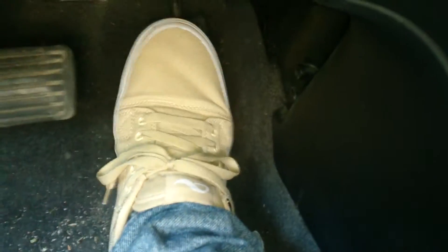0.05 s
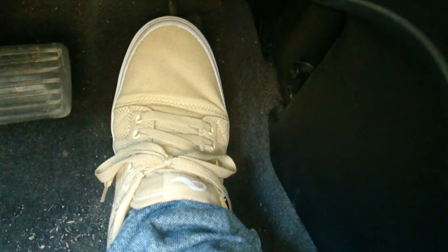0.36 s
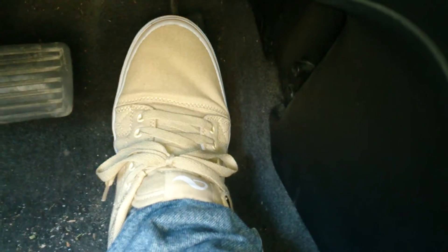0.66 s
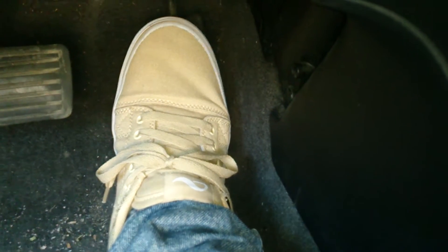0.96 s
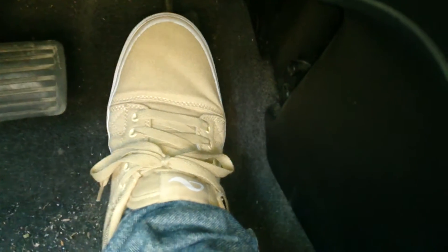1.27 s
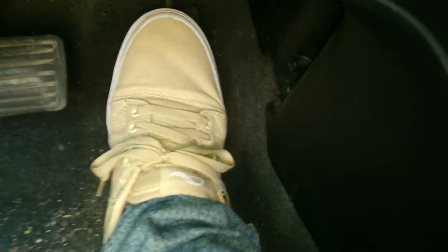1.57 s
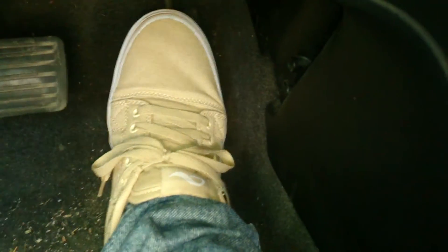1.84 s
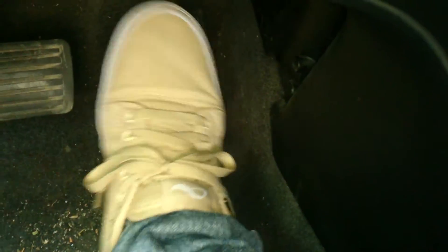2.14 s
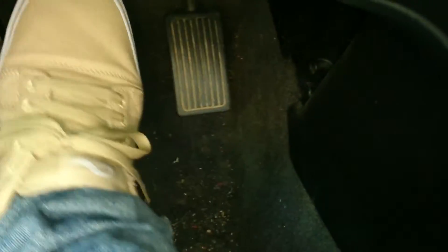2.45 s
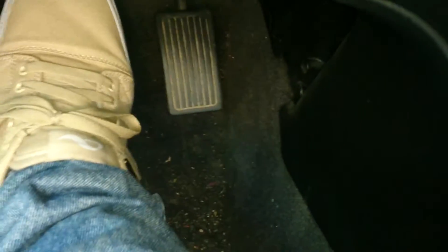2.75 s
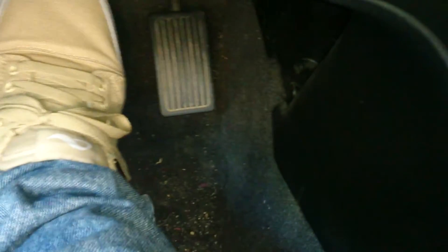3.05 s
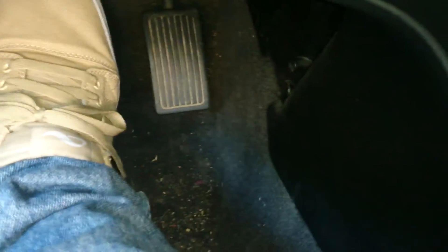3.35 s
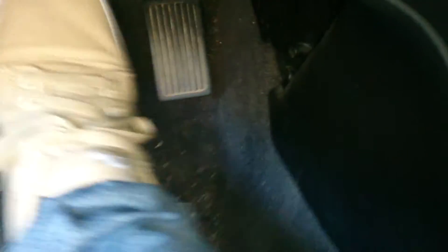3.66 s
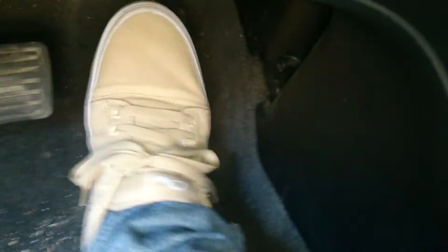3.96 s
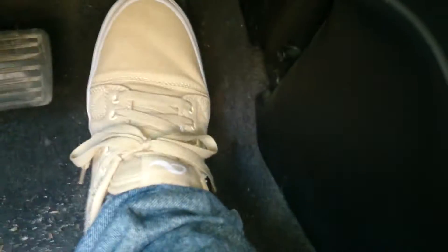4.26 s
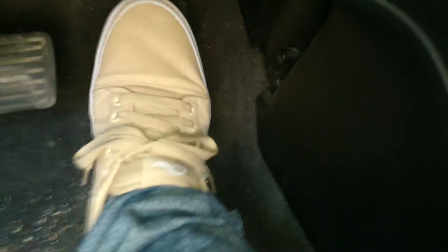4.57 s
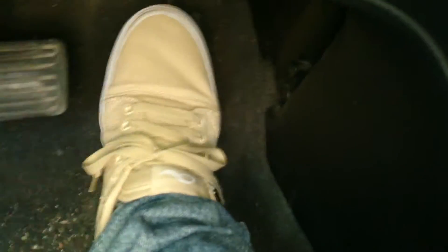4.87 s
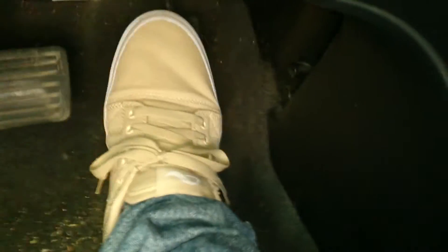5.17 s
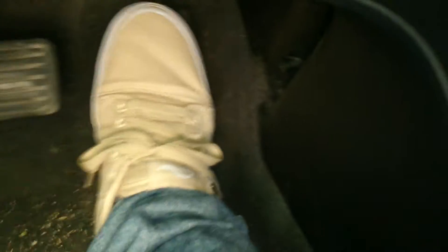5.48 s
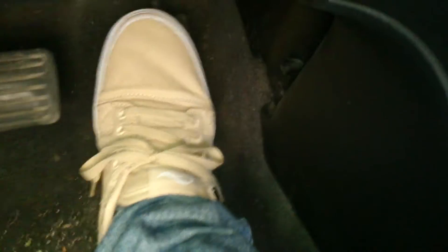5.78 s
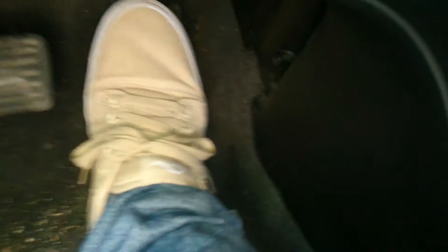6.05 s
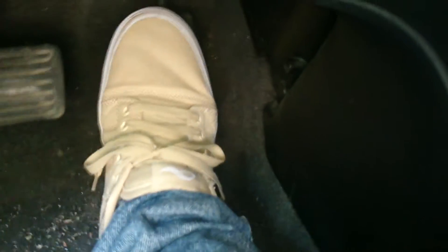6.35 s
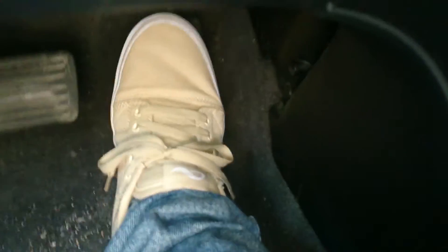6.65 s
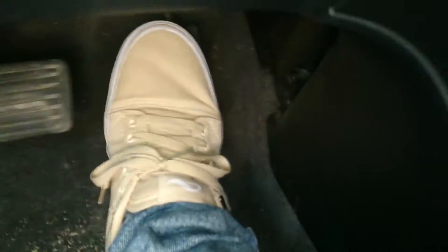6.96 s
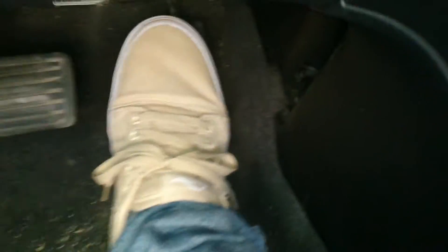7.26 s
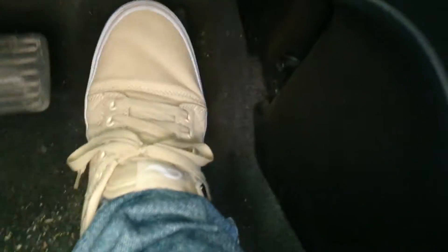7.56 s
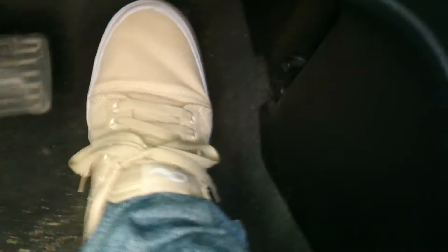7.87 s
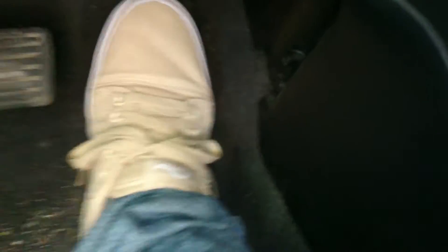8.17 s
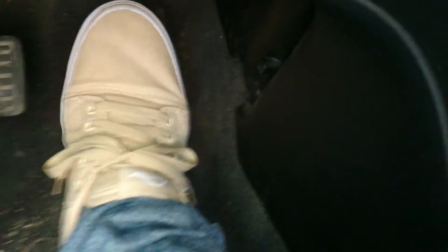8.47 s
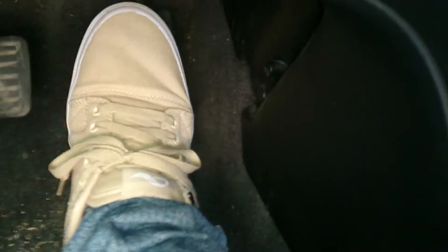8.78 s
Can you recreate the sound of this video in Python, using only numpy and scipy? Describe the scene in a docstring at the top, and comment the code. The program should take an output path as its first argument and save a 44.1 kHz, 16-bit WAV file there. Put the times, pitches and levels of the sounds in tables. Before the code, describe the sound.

Deep road rumble and a low engine hum fill a car cabin, with the microphone down by the pedals. A brief pedal creak comes first, then soft bumps and scuffs of a shoe. The engine picks up a little and the gravel road gets rougher, with dull jolts, clacking trim and sharp pebble strikes underneath. Through the second half, a bunch of keys clinks brightly nearby on the right.

```python
"""Driver's footwell of a car rolling slowly along a gravel road; stereo microphone low down, louder on the
right. From below, the body rumbles over bumps, tyres crunch and pebbles knock on the floor pan; loose trim
rattles. Beside the microphone the brake pedal sticks and slips in a creak, the shoe moves over to the
accelerator, and the engine picks up behind the bulkhead. Close by, small metal parts, likely the keys in
the ignition, strike each other and jingle."""
import sys
import numpy as np
from scipy import signal
from scipy.fft import rfft, irfft, next_fast_len
from scipy.io import wavfile
from scipy.ndimage import uniform_filter1d

SR = 44100
rng = np.random.default_rng(int(sys.argv[2]) if len(sys.argv) > 2 else 0)


def waveform_to_disk(signal):
    """Save audio, clipped to [-1, 1], as 16-bit WAV at the path in sys.argv[1]."""
    frames = np.transpose(np.atleast_2d(signal))
    scaled = np.clip(frames, -1, 1) * 32767
    samples = np.round(scaled).astype(np.int16)
    wavfile.write(sys.argv[1], SR, samples)


N = 397782
TIME = np.arange(N) / SR
AGE = TIME[:SR // 2]   # time since a blow


def from_db(db):
    return 10 ** (np.asarray(db) / 20)


def rms_one(x):
    return x / np.sqrt(np.mean(x ** 2) + 1e-20)


def blow_one(x):
    """Scales a blow to rms 1 over its first 20 ms."""
    return x / np.sqrt(np.mean(x[:SR // 50] ** 2) + 1e-20)


def in_time(rows):
    """Columns of a curve table at every sample."""
    s, *columns = np.transpose(rows)
    return [np.interp(TIME, s, c) for c in columns]


def on_bins(points, size):
    """Columns of a table over frequency at every FFT bin."""
    hz, *columns = np.transpose(points)
    bins = np.maximum(np.fft.rfftfreq(size, 1 / SR), 1)
    return [np.interp(np.log(bins), np.log(hz), c) for c in columns]


def coloured(x, spectrum):
    """Gives x a spectrum that falls away beyond its ends; rms 1."""
    closed = [(spectrum[0][0] / 2, -90), *spectrum, (spectrum[-1][0] * 2, -90)]
    size = next_fast_len(x.shape[-1])
    gain = from_db(on_bins(closed, size)[0])
    return rms_one(irfft(rfft(x, size) * gain, size)[..., :x.shape[-1]])


def drift(per_s):
    """A random wander between knots of rms 1."""
    knots = rms_one(rng.standard_normal(1000))
    return np.interp(TIME * per_s, np.arange(len(knots)), knots)


def rise(seconds):
    return 1 - np.exp(-AGE / seconds)


def fade(t60):
    return from_db(-60 * AGE / t60)


def span(start, length, edge_s):
    """Rises, holds and falls again."""
    return np.clip(np.minimum(TIME - start, start + length - TIME) / edge_s + .5, 0, 1)


def resonate(x, modes):
    """Parallel resonances of alternating sign."""
    out = 0
    for k, (hz, width, db) in enumerate(modes):
        r = np.exp(-np.pi * width / SR)
        ring = signal.lfilter([1, 0, -1], [1, -2 * r * np.cos(2 * np.pi * hz / SR), r * r], x + 1e-18)
        out = out + (-1) ** k * from_db(db) * (1 - r * r) / 2 * ring
    return out


def butter(x, hz, kind):
    return signal.sosfilt(signal.butter(2, hz, kind, fs=SR, output="sos"), x)


def add(track, s, sound):
    at = round(s * SR)
    track[at:at + len(sound)] += sound[:N - at]


def contact(t60, click):
    """A first click, then a quickly dying chatter."""
    force = rng.standard_normal(len(AGE)) * fade(t60)
    force[0] += click
    return force


def burst(colour, rise_s, t60):
    """A short blow of coloured noise."""
    return blow_one(coloured(rng.standard_normal(len(AGE)), colour) * rise(rise_s) * fade(t60))


def random_hits(per_s, size_db):
    """Impulses of uneven size at random times."""
    return (rng.random(N) < per_s / SR) * from_db(size_db * np.clip(rng.standard_normal(N), -2, 2))


def placed(x, right_db):
    """Leans a sound to the right, keeping the mean of both sides."""
    sides = from_db([[0], [right_db]])
    return x * sides / sides.mean()


def footwell(x, wet_db, t60, shaded_db):
    """Short reflections off trim and carpet; the direct sound reaches the shaded left late and weak."""
    echoes = rng.standard_normal((2, len(AGE))) * fade(t60) * rise(0.0027)
    echoes /= np.sqrt(np.sum(echoes ** 2, axis=1, keepdims=True))
    late = np.interp(TIME - .00025, TIME, x)
    direct = np.array([from_db(shaded_db) * late, 1.375 * x])
    return direct + from_db(wet_db) * signal.oaconvolve(x[None], echoes, axes=1)[:, :N]


# Road noise across the microphone: f/Hz, right over left/dB, likeness/0-1, lead of the left/rad
ROAD_FIELD = [(25, 14, 0.98, 0.97), (71, 5.5, 0.8, 0.18), (202, 3.5, 0.89, 0.078), (650, 5, 0.83, 0.091),
              (1330, 14.5, 0, 0.063), (2500, 9.5, 0, 0.51), (7000, 7.5, 0.08, 0.47), (15000, 0, 0.02, 0)]

def road_noise(pair, spectrum, steady_s):
    """Two noises become a field alike in the bass, diffuse in the treble, evened to 1 over steady_s."""
    size = next_fast_len(N)
    right_db, alike, lead = on_bins(ROAD_FIELD, size)
    mid, side = rfft(pair, size) * np.sqrt([1 + alike, 1 - alike])
    left = (mid + side) * from_db(-right_db / 2) * np.exp(1j * lead)
    right = (mid - side) * from_db(right_db / 2)
    field = coloured(irfft([left, right], size)[:, :N], spectrum)
    return field / np.sqrt(uniform_filter1d(field.mean(0) ** 2, int(steady_s * SR)) + 1e-9)


def gravel(per_s, size_db):
    """Stones grind under the tyres: random clicks of very uneven size."""
    born = rng.random(N) < per_s * from_db(4 * drift(14)) / SR
    sizes = from_db(size_db * np.minimum(rng.exponential(1, N), 2))
    return rms_one(born * sizes * rng.standard_normal((2, N)))


# How hard the car rolls: t/s, level re full pace/dB
PACE = [(0, -4), (0.7, -12.5), (1.7, -11.5), (3.5, -13.5), (3.85, -3.5), (4.7, -4.5), (5.1, 0), (5.9, -0.5),
        (7.3, 2), (9.02, -0.5)]
# Bumps passing underneath: crest t/s, lift of the rumble/dB, length/s (the swell spans 1.4 lengths)
BUMPS = [(0.182, 11.5, 0.18), (1.086, 10.5, 0.081), (1.387, 14.5, 0.15), (3.63, 8, 0.16),
         (4.186, 9.5, 0.11), (4.452, 8, 0.078), (4.993, 4.5, 0.89), (5.822, 3, 0.062), (7.15, 2.5, 0.36),
         (8.159, 7.5, 0.2)]
# Spectra of body, cabin, tyres and gravel, from inside the car: f/Hz, density/dB
BODY_RUMBLE = [(7.1, -33), (12, 5), (29, -2.5), (72, -12), (94, -28.5), (160, -120)]
CABIN_BOOM = [(45, -33), (66, -0.5), (85, 5.5), (105, -2), (135, -7.5), (165, -28)]
TYRE_ROAR = [(100, -32), (170, 0), (232, 3), (305, -3), (444, -6.5), (520, -2), (622, -9), (716, -6.5),
             (811, -20.5), (941, -18), (1030, -37), (1100, -26), (1430, -41), (2420, -120)]
GRAVEL_CRUNCH = [(590, -15), (1000, 3.5), (1610, -3), (2370, -5), (2930, -10.5), (5660, -18), (7260, -13.5),
                 (8140, -20.5), (9860, -23.5), (10700, -26), (15000, -39.5)]
# Cabin resonances around the microphone: f/Hz, width/Hz, level/dB
CABIN_MODES = [(517.2, 9.1, 2.5), (260, 6, -17.5), (930, 25, -13.5)]

def road():
    """The body heaves on its springs, the cabin booms, tyres roar; more pace makes the crunch grittier."""
    pace_db, = in_time(PACE)
    lift_db = sum(db * np.cos(np.pi * np.clip((TIME - s) / length / 1.4, -.5, .5)) ** 2
                  for s, db, length in BUMPS)
    white = rng.standard_normal((4, 2, N))
    rumble = road_noise(white[0], BODY_RUMBLE, steady_s=0.1133)
    boom = road_noise(white[1], CABIN_BOOM, steady_s=0.17)
    tread = white[2] * from_db(1.8 * drift(25) + 1.2 * drift(9.1))
    roar = road_noise(tread + 0.5 * resonate(tread, CABIN_MODES), TYRE_ROAR, steady_s=0.38)
    stones = white[3] + from_db(0.68 * pace_db + 4.5) * gravel(per_s=1100, size_db=2.5)
    crunch = road_noise(stones, GRAVEL_CRUNCH, steady_s=0.47)
    # each part: its level at full pace, plus its share of the pace and of the bumps
    return (from_db(-17 + pace_db + lift_db) * rumble
            + from_db(-29.5 + 0.96 * pace_db + 0.42 * lift_db) * boom
            + from_db(-44 + 0.5 * pace_db + 0.061 * lift_db) * roar
            + from_db(-58 + 0.68 * pace_db) * crunch)


# Engine, behind the bulkhead: t/s, firing f/Hz, first order level/dB, second order level/dB
ENGINE_RUN = [(0.0, 40.38, -27.5, -45), (0.7, 38.79, -32.5, -55), (2.0, 37.66, -29.5, -49.5),
              (3.3, 37.77, -35, -44.5), (4.6, 39.32, -26.5, -31.5), (5.73, 41.69, -19.5, -32.5),
              (6.4, 39.96, -40, -32), (8.29, 42.68, -29.5, -26.5), (9.02, 41.3, -32.5, -26.5)]
# Its higher orders: multiple of the firing rate, level/dB
ENGINE_ORDERS = [(3.5, -51), (6, -59.5), (6.5, -64.5), (8, -62.5), (9, -64.5)]
# Its burr: f/Hz, density/dB
BURR_COLOUR = [(170, -16), (215, 2.5), (330, 5.5), (380, -11)]

def engine(burr_db=-55.5):
    """The firing orders hum and a burr pulses with each firing; under load the second order drones."""
    firing_hz, first_db, drone_db = in_time(ENGINE_RUN)
    phase = 2 * np.pi * np.cumsum(firing_hz * (1 + 0.00698 * drift(8))) / SR
    first = from_db(first_db + 1.5 * drift(5.9)) * np.sin(phase)
    drone = from_db(drone_db + 1.2 * drift(7.8)) * np.sin(2 * phase)
    higher = sum(from_db(db + 2.7 * drift(4.6)) * np.sin(order * phase) for order, db in ENGINE_ORDERS)
    burr = from_db(burr_db) * coloured(rng.standard_normal(N) * (1 + np.cos(phase)), BURR_COLOUR)
    return np.sqrt(2) * (first + drone + higher) + burr


# Faint whine from the engine bay, well right of the microphone: t/s, level/dB
WHINE_LEVEL = [(0, -69), (1.6, -68), (2.2, -66), (2.9, -63.5), (3.4, -74), (4.5, -68.5), (9, -63.5)]

def whine(hz=950, width_hz=55):
    """A narrow, unsteady tone, perhaps the fan."""
    line = [(hz, width_hz, 0)]
    tone = rms_one(resonate(resonate(rng.standard_normal(N), line), line))
    return from_db(in_time(WHINE_LEVEL)[0]) * tone


# Floor pan, just under the microphone: f/Hz, width/Hz, level/dB
PAN_MODES = [(550, 150, 18.5), (930, 1100, 12.5), (1260, 290, 9.5), (2010, 290, 16), (2370, 250, 11.5),
             (2740, 250, 11.5), (3430, 1300, 7.5)]

def grit(per_s=16, level_db=-63, t60=0.09):
    """Small stones thrown up at random tick on the floor pan, harder and more often with pace."""
    pace = from_db(in_time(PACE)[0])
    thrown = random_hits(per_s * pace, size_db=2.5) * pace
    force = signal.oaconvolve(thrown, fade(t60))[:N] * rng.standard_normal(N)
    return from_db(level_db) * rms_one(butter(resonate(force, PAN_MODES), 2700, "low"))


# Loose trim knocking in the cabin: t/s, level/dB, panel f/Hz
TRIM_KNOCKS = [(3.942, -54, 1015), (4.177, -52, 850), (4.305, -53, 787), (4.944, -44, 890),
               (5.421, -64, 720), (5.665, -37.5, 1000), (6.675, -47, 720), (7.297, -56, 800),
               (7.568, -40.5, 620), (7.798, -49, 690)]
# Panels that rattle at random: f/Hz
LOOSE_PANELS = [480, 620, 754, 1180]

def trim(t60=0.049, width_hz=450, per_s=4, rattle_db=-57):
    """Heavily damped panels give dull clacks at the bumps and rattle more as the car gathers pace."""
    knocks, loose = np.zeros((2, N))
    pace = from_db(in_time(PACE)[0])
    for s, db, hz in TRIM_KNOCKS:
        add(knocks, s, from_db(db) * blow_one(resonate(contact(t60, click=7), [(hz, width_hz, 0)])))
    for hz in LOOSE_PANELS:
        taps = (rng.random(N) < per_s * pace / SR) * pace * rng.uniform(.5, 1, N)
        force = signal.oaconvolve(taps, contact(t60, click=6.2))[:N]
        loose += resonate(force, [(hz, width_hz, 0)])
    return butter(knocks + from_db(rattle_db) * rms_one(loose), 1300, "low")


# Suspension jolts, heard through the body: t/s, drumming level/dB, clunk level/dB, t60/s
JOLTS = [(0.149, -59, -56, 0.31), (2.199, -54, -47.5, 0.26), (3.775, -43, -40, 0.14),
         (4.176, -42, -60, 0.065), (4.53, -48, -47, 0.23), (4.941, -34, -42.5, 0.036),
         (5.04, -54, -46.5, 0.11), (5.135, -36.5, -48.5, 0.19), (5.189, -38.5, -47, 0.068),
         (5.405, -41, -65, 0.089), (5.699, -46, -68, 0.13), (6.097, -56, -43.5, 0.21),
         (6.156, -55, -45.5, 0.081), (7.001, -39, -42, 0.12), (7.155, -35.5, -47, 0.078),
         (7.736, -33.5, -42, 0.27), (7.795, -39, -44.5, 0.15), (8.16, -37, -44.5, 0.16),
         (8.465, -37, -43.5, 0.27)]
# Resonances of the drumming, then of the clunk: f/Hz, width/Hz, level/dB
JOLT_MODES = [
    [(143, 27, 5), (207, 60, 1), (229, 72, 1), (350, 68, -6.5)],
    [(420, 160, -6.5), (530, 34, 6), (680, 200, -9.5)],
]

def jolts(top_hz=(400, 900)):
    """A wheel drops into a rut: the body drums briefly and the suspension clunks."""
    out = np.zeros(N)
    for s, *levels_db, t60 in JOLTS:
        for db, modes, hz in zip(levels_db, JOLT_MODES, top_hz):
            knock = butter(resonate(contact(t60, click=12), modes), hz, "low")
            add(out, s, from_db(db) * knock / np.sqrt(np.mean(knock[:SR // 25] ** 2)))
    return out


# Brake pedal, beside the microphone: t/s, length/s, first level/dB, swell/dB, upper modes re lower/dB
CREAKS = [(0.355, 0.045, -59, -2, -20), (0.423, 0.11, -51.5, -0.5, -23), (0.556, 0.022, -51, 10, -13),
          (0.593, 0.021, -42, -7, -10.5), (0.635, 0.04, -47.5, -2, -9.5), (2.999, 0.066, -49.5, -3.5, -7.5)]
# Its arm, lower then upper modes: f/Hz, width/Hz, level/dB
PEDAL_MODES = [
    [(1165, 140, 2), (1335, 90, 6.5), (1450, 130, 1.5)],
    [(1750, 120, -2), (2010, 90, 2), (2400, 160, 6.5), (2840, 330, -1)],
]
# It gives way with a rasp: t/s, level/dB, t60/s
RASPS = [(0.597, -59, 0.056), (3.004, -55.5, 0.072)]
# Spectrum of the rasp: f/Hz, density/dB
RASP_COLOUR = [(1200, 1), (2400, -10), (3100, -17), (4000, -2.5), (4900, -15), (5600, -17)]

def brake_pedal(slips_per_s=60, middling_db=-43.5, doubling_db=18, gain_db=3.5, top_hz=(1800, 2700)):
    """The pivot sticks and slips, faster under pressure; every slip rings the arm, and it rasps free."""
    out = np.zeros(N)
    for start, length, first_db, swell_db, upper_db in CREAKS:
        s = start
        for strength, wait in rng.standard_normal((24, 2)):
            force = contact(t60=.026, click=0) * rise(0.0018)
            if s > start + length:
                continue
            db = first_db + swell_db * (s - start) / length
            for part_db, modes, hz in zip((0, upper_db), PEDAL_MODES, top_hz):
                ring = blow_one(butter(butter(resonate(force, modes), hz, "low"), 1250, "high"))
                add(out, s, from_db(db + part_db + 2 * strength + gain_db) * ring)
            slip_rate = slips_per_s * 2 ** ((db - middling_db) / doubling_db)
            s += np.exp(0.12 * wait) / slip_rate
    for s, db, t60 in RASPS:
        add(out, s, from_db(db) * burst(RASP_COLOUR, rise_s=0.0018, t60=t60))
    return out


# Shoe on pedals and mat, at close range: t/s, level/dB, step from thud to scuff to swish/dB
SHOE_TOUCHES = [(0.813, -63, -1.5), (0.898, -62.5, -2), (2.182, -41.5, -29), (2.212, -46.5, -15.5),
                (2.437, -42.5, -11.5), (2.534, -64, -1), (2.622, -53, -6.5), (3.263, -57, -14),
                (3.741, -50, -5.5), (3.775, -44, -31), (3.802, -74, 8), (4.034, -36, -8.5), (4.05, -43, 4),
                (4.352, -77, 7.5), (4.459, -65, 4)]
# The sole slides across: t/s, length/s, swish level/dB, scuff level/dB
SHOE_SLIDES = [(2.17, 0.25, -78, -77), (2.435, 0.18, -71, -65), (3.02, 0.2, -99, -70),
               (3.637, 0.39, -69.5, -83), (4.402, 0.2, -72.5, -67)]
# Spectra of thud, scuff and swish: f/Hz, density/dB
SHOE_COLOURS = [
    [(200, -34), (500, 10), (750, 4), (1300, -8), (2500, -31)],
    [(700, -30), (1500, 2), (2250, 6.5), (3600, -6.5), (6000, -14.5)],
    [(2800, -5), (4500, -7), (7300, 0), (9500, -10), (14000, -22.5)],
]

def shoe(parts_db=(-3.5, -1, -2.5), parts_t60=(0.06, 0.065, 0.032)):
    """The soft sole bumps and scuffs over pedals and mat, and slides between them."""
    out = np.zeros(N)
    _, scuff, swish = SHOE_COLOURS
    for k, colour in enumerate((swish, scuff)):
        sliding = sum(from_db(db[k]) * span(s, length, edge_s=0.067) for s, length, *db in SHOE_SLIDES)
        out += sliding * coloured(rng.standard_normal(N) * from_db(7 * drift(65)), colour)
    for s, db, step_db in SHOE_TOUCHES:
        for k, (part_db, t60, colour) in enumerate(zip(parts_db, parts_t60, SHOE_COLOURS)):
            add(out, s, from_db(db + part_db + k * step_db) * burst(colour, rise_s=0.00056, t60=t60))
    return out


# Sharp knocks near the microphone: pebbles on the floor pan, and at 4.961, 5.478 and 7.208 s clacks of
# the keys: t/s, level/dB, crack re body/dB, struck spot f/Hz, spot re body before spot_gain/dB
SHARP_KNOCKS = [(4.485, -52.5, -13, 2020, -2), (4.562, -60, -20, 2150, -2), (4.663, -46, -25, 2650, -6),
                (4.904, -45.5, -26, 2200, -11), (4.961, -52, -2, 2360, -11), (5.478, -53, 6, 1870, 3),
                (5.666, -41.5, 1.5, 3280, -11), (6.098, -42.5, -10, 2970, -19),
                (6.4137, -31, -3, 2420, -7.5), (6.676, -35.5, -16, 2850, -15),
                (7.002, -39.5, -1.5, 2320, 0.5), (7.157, -37, -43, 1340, -9.5),
                (7.208, -46.5, 8, 2470, -15), (7.57, -51, -24, 2760, -5), (7.675, -53.5, 1, 3000, -9),
                (7.715, -46.5, -2, 3000, -18), (7.978, -50.5, -28, 2880, -7.5),
                (8.091, -49, -10, 2440, -16), (8.305, -44, -16, 1260, -19), (8.832, -51.5, -1.5, 2470, -25)]

def sharp_knocks(middling_db=-43.5, chatter_t60=0.053, halving_db=29, spot_width_hz=190, spot_gain=2):
    """A pebble or key strikes: a ringing body, a woody note from the struck spot, a dry crack on top."""
    out = np.zeros(N)
    for s, db, crack_db, spot_hz, spot_db in SHARP_KNOCKS:
        t60 = chatter_t60 * 2 ** ((middling_db - db) / halving_db)   # a harder hit bounces clear sooner
        force = contact(t60, click=4)
        modes = [(hz, width, mode_db + 3 * rng.standard_normal()) for hz, width, mode_db in PAN_MODES]
        body = blow_one(butter(resonate(force, modes), 5600, "low"))
        note = spot_gain * blow_one(resonate(force, [(spot_hz, spot_width_hz, 0)]))
        crack = blow_one(butter(butter(force, 2400, "high"), 8800, "low"))
        add(out, s, from_db(db) * (body + from_db(spot_db) * note + from_db(crack_db) * crack))
    return out


# The bunch of keys swings, close by on the right: t/s, length/s, level/dB
KEY_SWINGS = [(4.88, 0.19, -54.5), (5.419, 0.076, -57.5), (5.643, 0.15, -60), (5.931, 0.2, -54.5),
              (6.247, 0.057, -48.5), (6.322, 0.12, -43), (6.452, .15, -50), (6.656, 0.11, -49),
              (6.82, 0.08, -48), (6.956, 0.092, -44), (7.209, 0.319, -51), (7.663, .21, -58),
              (8.267, 0.055, -44), (8.317, 0.21, -54.5), (8.788, .22, -62.5)]
# Spectrum of its light touches: f/Hz, density/dB
TOUCH_COLOUR = [(2500, 3), (5600, -4.5), (6600, 6), (7450, 2), (8400, 0.5), (9800, -8.5), (11200, -2.5),
                (13500, -18.5), (14600, -8), (15800, -11)]

def key_rustle(touch_t60=0.028):
    """While the bunch swings, the keys slide over each other in a rustle of light touches."""
    swing = sum(from_db(db) * span(s, length, edge_s=0.027) for s, length, db in KEY_SWINGS)
    touches = random_hits(per_s=320, size_db=6.5)
    chatter = signal.oaconvolve(touches, fade(touch_t60))[:N] * rng.standard_normal((2, N))
    return placed(swing * coloured(chatter, TOUCH_COLOUR), right_db=12)


# Clinks, close by: t/s, level/dB, middle and top group re low/dB, f/Hz of the mode that rings on, its t60/s
CLINKS = [(4.899, -37.5, -2.5, -17, 7530, 0.022), (4.915, -30.5, -6, -18, 7440, 0.016),
          (4.92, -37, -15, -11, 7440, 0.033), (4.97, -45.5, -4, -22, 7940, 0.025),
          (4.987, -56, 4, -15, 10125, 0.082), (5.028, -56, -1, -16, 7120, 0.025),
          (5.444, -63, 11, 13, 13025, 0.027), (5.453, -57, 17, 9, 10755, 0.09),
          (5.46, -31.5, -11, -14, 7440, 0.017), (5.477, -36, -17, -8, 7440, 0.022),
          (5.484, -42, 2, -15, 14310, 0.025), (5.651, -53, -5, -7, 6510, 0.025),
          (5.682, -38.5, 6.5, -2, 10910, 0.021), (5.703, -32, -13, -21, 7705, 0.15),
          (5.728, -43, -12, -19, 7705, 0.025), (5.769, -52.5, -6, -5, 14550, 0.034),
          (5.947, -45.5, -4, -4, 7530, 0.032), (6.078, -52, 4.5, 1, 10755, 0.13),
          (6.275, -31, -16, -18, 6630, 0.037), (6.285, -48, -2, 1, 14550, 0.025),
          (6.34, -39, -6, 2, 14550, 0.027), (6.35, -32.5, -6, -3, 7705, 0.045),
          (6.369, -41.5, -13, -12, 6630, 0.028), (6.392, -43, 1, 3, 10910, 0.073),
          (6.417, -45, 7, 13.5, 14310, 0.17), (6.487, -48, -12, -11, 14310, 0.025),
          (6.57, -34.5, -8, -18, 7530, 0.027), (6.59, -59, 3, 2, 10125, 0.025),
          (6.655, -53, -1, -7, 7440, 0.022), (6.68, -42, -7, -22, 6630, 0.13),
          (6.705, -44.5, -6, -15, 10910, 0.13), (6.831, -35, 0, -18, 6630, 0.061),
          (6.865, -40.5, -27, -18, 7440, 0.011), (6.958, -45, -3.5, -6, 7940, 0.025),
          (6.982, -52, 5, 3, 14310, 0.025), (7.005, -55, 6, -11, 11340, 0.025),
          (7.085, -52.5, -8, -5, 7340, 0.022), (7.109, -42.5, -15, -9, 7530, 0.019),
          (7.212, -34, -5.5, -9, 7705, 0.033), (7.218, -40, -16, -14, 7705, 0.025),
          (7.243, -41, -8, -19, 7705, 0.025), (7.295, -42, -6, -2, 6510, 0.04),
          (7.326, -35, -12.5, -14, 7440, 0.035), (7.37, -36.5, 3, 3, 14640, 0.073),
          (7.4, -46, -7, -3, 7705, 0.024), (7.416, -37.5, -11, -18, 14550, 0.14),
          (7.492, -53, -4.5, -3, 7440, 0.02), (7.673, -59, 2, -3, 11340, 0.025),
          (7.696, -52, 3, 4, 8430, 0.033), (7.717, -51, -3, -14, 6630, 0.023),
          (7.753, -57, 0, -9, 6630, 0.025), (7.866, -55, -17, -30, 7010, 0.03),
          (8.085, -52.5, -0.5, 4, 14550, 0.025), (8.162, -42, -10.5, -11, 7340, 0.021),
          (8.278, -45.5, 0, -12, 7705, 0.25), (8.289, -40, 0, -7, 11340, 0.096),
          (8.345, -47.5, 5, 2, 7705, 0.083), (8.409, -40, -7.5, -20, 7705, 0.085),
          (8.441, -38.5, -6.5, -31, 7705, 0.042), (8.503, -49.5, -8, -12, 7340, 0.025),
          (8.77, -58.5, -1, -6, 6630, 0.03)]
# Modes of the keys, in a low, a middle and a top group: f/Hz, level/dB
KEY_MODES = [
    [(4660, -18), (6510, -3), (6630, -1), (7010, 1), (7120, -2), (7310, -5), (7440, 5), (7530, 6.5),
     (7705, -7), (7900, -4)],
    [(8430, -5), (8900, 1), (9855, -8), (10125, -5), (10755, -4.5), (10910, 2.5), (11340, 1.5),
     (11490, 5.5), (11800, 4.5), (12140, 8), (12600, -9), (13025, -5), (13450, -3)],
    [(14310, -10.5), (14450, 0), (14550, 11), (14640, -4), (14965, 5), (15175, 3.5), (15500, -4.5)],
]
# Hiss that starts a clink, for each group: f/Hz, density/dB
KEY_HISS = [
    [(1200, 0), (2800, 4), (5500, -3), (6600, -3.5), (7500, 16), (8600, -3.5), (10000, -7.5)],
    [(7500, -13.5), (8600, 12.5), (10200, 2.5), (11200, -7), (12300, -2.5), (14000, 1)],
    [(12500, -14), (13800, -13.5), (14600, 12), (15500, -2), (16200, -29.5)],
]
# Each group at the microphone: level/dB, shaded left side re right/dB
KEY_GROUPS = [(0, -19.5), (0, -9.5), (0, -23)]

def key_clinks(damped_t60=.021, hold_s=0.0044, hiss_t60=.032, ring_db=-1.5, hiss_db=-10, gain=2):
    """Two keys strike and ring in a new mix of modes each time; neighbours damp all but one unevenly."""
    out, attack = np.zeros((2, N)), rise(0.00062)
    flutter = from_db(3 * rms_one(butter(rng.standard_normal(N + len(AGE)), 300, "low")))
    # each clink starts with a short hiss that holds briefly, then dies
    hiss_envelope = attack * np.minimum(1, from_db(-60 * (AGE - hold_s) / hiss_t60))
    for group, (group_db, left_db) in enumerate(KEY_GROUPS):
        hz, mode_db = np.transpose(KEY_MODES[group])
        noise = coloured(rng.standard_normal((2, len(flutter))), KEY_HISS[group]) * flutter
        for s, db, middle_db, top_db, free_hz, free_t60 in CLINKS:
            strength, left_mix, detune, damping, phase = rng.standard_normal((5, len(hz)))
            free = np.exp(-((hz - free_hz) / 60) ** 2)   # 1 for the mode that rings on
            t60 = (1 - free) * damped_t60 * 2 ** (0.41 * np.clip(damping, -2, 2)) + free * free_t60
            turns = np.outer(hz * (1 + 0.0042 * detune * (1 - free)), AGE) + phase[:, None]
            decay = np.exp(np.maximum(np.outer(-np.log(1000) / t60, AGE), -20))
            partials = np.sin(2 * np.pi * turns) * decay
            heights = from_db(mode_db + 5 * strength * (0.5 - free) + 9 * free)
            level_db = db + group_db + (0, middle_db, top_db)[group]
            for side, (side_db, mix) in enumerate([(left_db, left_mix), (0, 1)]):
                ring = from_db(ring_db) * blow_one((heights * mix) @ partials * attack)
                hiss = from_db(hiss_db) * blow_one(noise[side, round(s * SR):][:len(AGE)] * hiss_envelope)
                add(out[side], s, gain * from_db(level_db + side_db) * (ring + hiss))
    return out


# Keys that hang free in the same bunch: f/Hz, width/Hz, level/dB
HANGING_MODES = [(6600, 25, -6), (7460, 30, -3), (7715, 16, -8), (9850, 20, 7.5), (10910, 26, -8),
                 (10900, 20, -7), (12190, 20, -3.5), (13026, 12, 4.5), (14545, 18, -8.5), (15160, 20, 1.5)]

def hanging_keys(bunch):
    """The free keys pick up every clink and ring in sympathy."""
    return sum(resonate(bunch, [mode]) for mode in HANGING_MODES)


# Heavy part of the bunch, close by: t/s, f/Hz, level/dB, t60/s
CLANKS = [(6.394, 4730, -55, .12), (6.418, 4540, -57, .3), (6.833, 2940, -41, 0.036),
          (6.833, 4700, -65, .3), (7.33, 2870, -47, 0.049), (8.41, 2880, -47, 0.042)]

def key_clanks():
    """The heavy part of the bunch is knocked and gives a low ping."""
    out = np.zeros(N)
    for s, hz, db, t60 in CLANKS:
        add(out, s, from_db(db) * blow_one(np.sin(2 * np.pi * hz * AGE) * fade(t60)))
    return out


def key_snap(at_s=7.4398, tick_db=-5, knock_db=-21, ping_db=-48, ping_hz=4660):
    """One key hits another squarely: a sharp tick and knock leave a thin ping of the lowest mode."""
    out, force = np.zeros(N), contact(t60=0.0068, click=1.2)
    tick = butter(force, 9400, "high")
    knock = butter(butter(force, 760, "high"), 1500, "low")
    for db, part in ((tick_db, tick), (knock_db, knock)):
        add(out, at_s, from_db(db) * part / np.abs(part).max())
    add(out, at_s, from_db(ping_db) * np.sin(2 * np.pi * ping_hz * AGE) * fade(0.26))
    return out


def scene():
    """Everything as it reaches the microphone low in the footwell, louder on the right."""
    bunch = key_clinks() + key_rustle()
    hard_hits = footwell(key_clanks() + key_snap(), wet_db=-13.5, t60=0.045, shaded_db=-31)
    keys = bunch + hanging_keys(bunch) + placed(hard_hits, right_db=2)
    knocks = placed(footwell(sharp_knocks() + grit(), wet_db=-17.5, t60=0.15, shaded_db=-10), right_db=2)
    foot = placed(footwell(shoe() + brake_pedal(), wet_db=-2, t60=0.069, shaded_db=-9.5), right_db=6)
    car = placed(engine() + jolts() + trim(), right_db=7) + placed(whine(), right_db=21)
    return (road() + car + keys + knocks + foot) * span(.005, N / SR - .01, edge_s=.01)


def record(dry, ceiling=.56, cutoff_hz=16300):
    """The heavy lows overload and are flattened while the treble rides on top; the very top is cut."""
    lows = butter(dry, 8700, "low")
    flattened = dry - lows + np.clip(lows, -ceiling, ceiling)
    return signal.sosfilt(signal.cheby2(16, 70, cutoff_hz, fs=SR, output="sos"), flattened)


dry = scene()
out = record(dry)
waveform_to_disk(out)
```